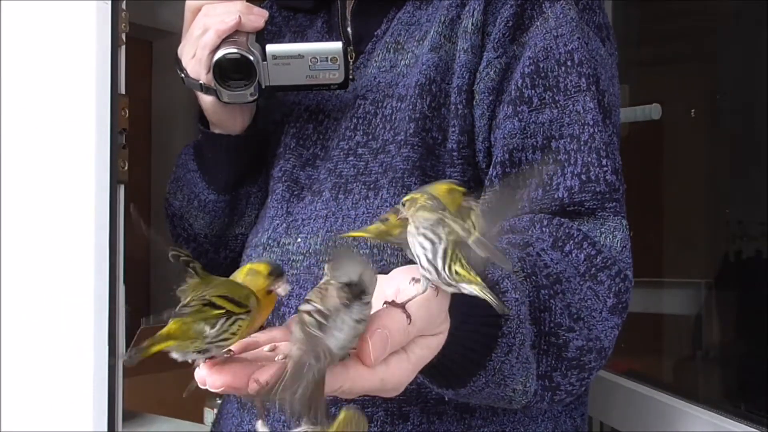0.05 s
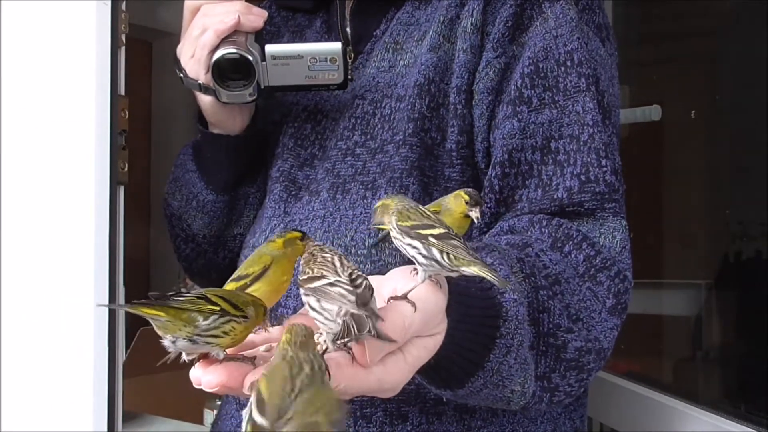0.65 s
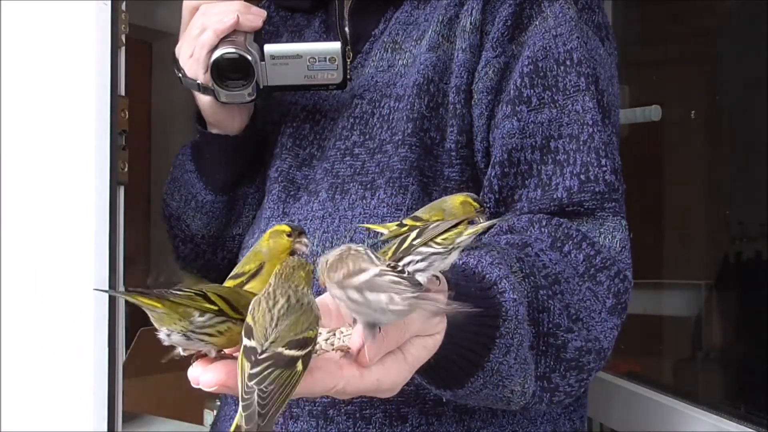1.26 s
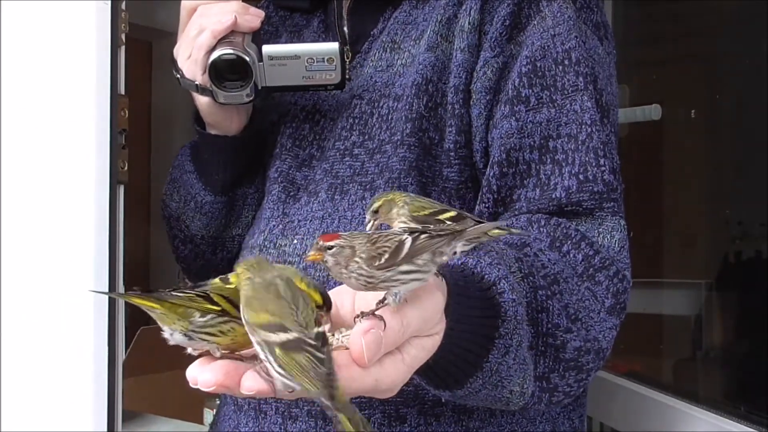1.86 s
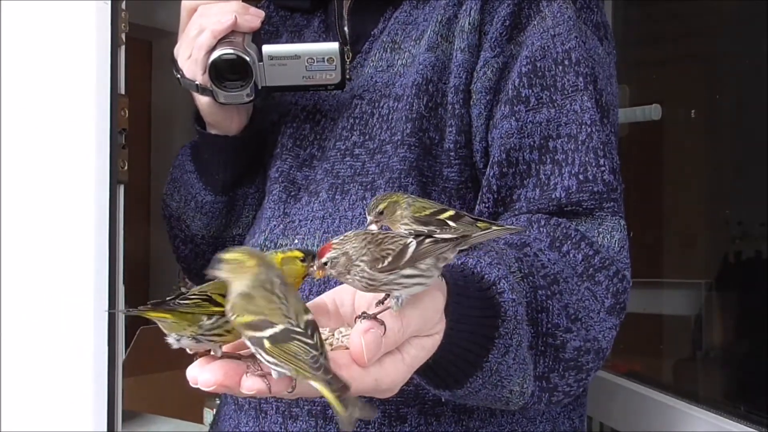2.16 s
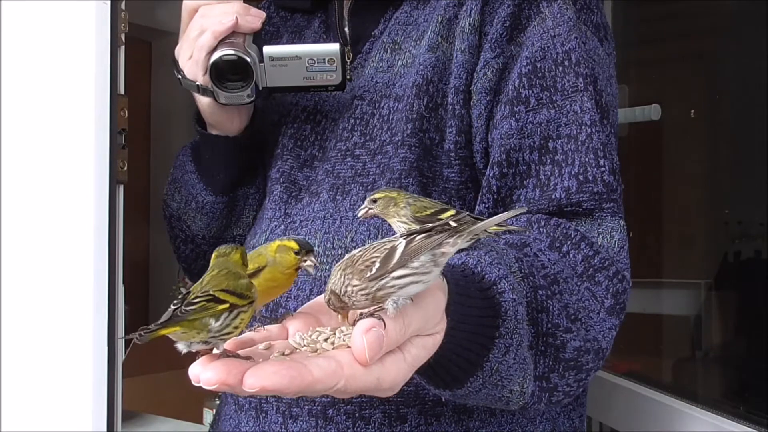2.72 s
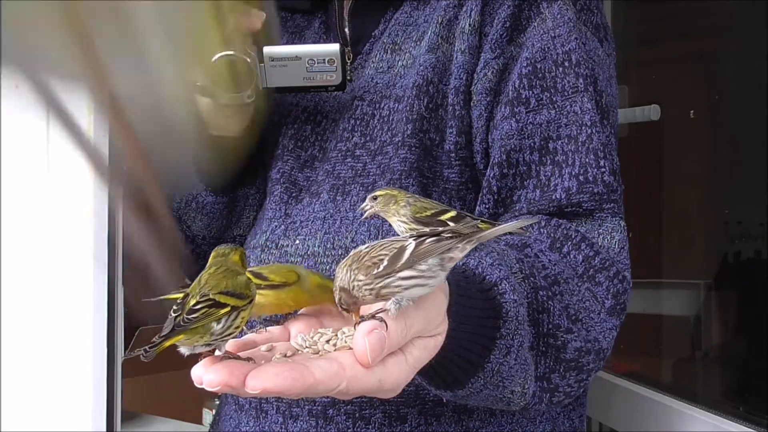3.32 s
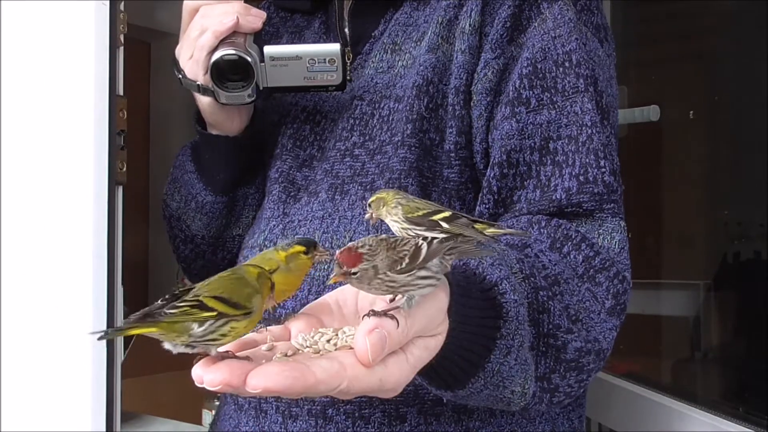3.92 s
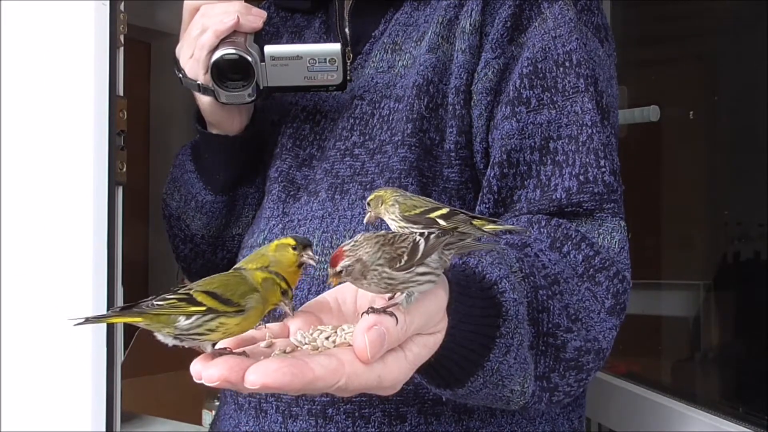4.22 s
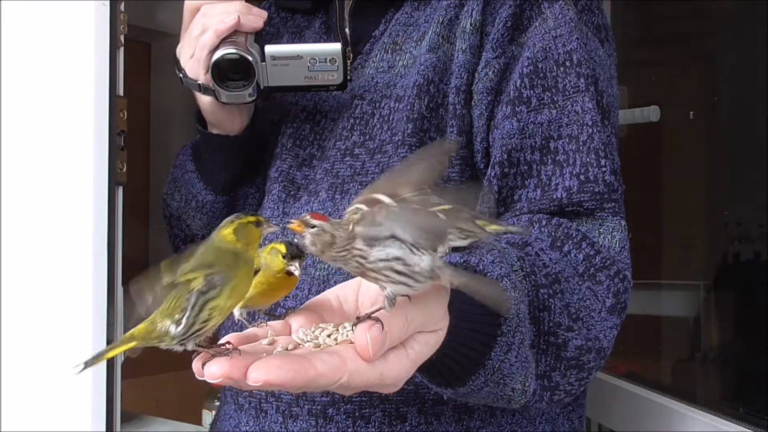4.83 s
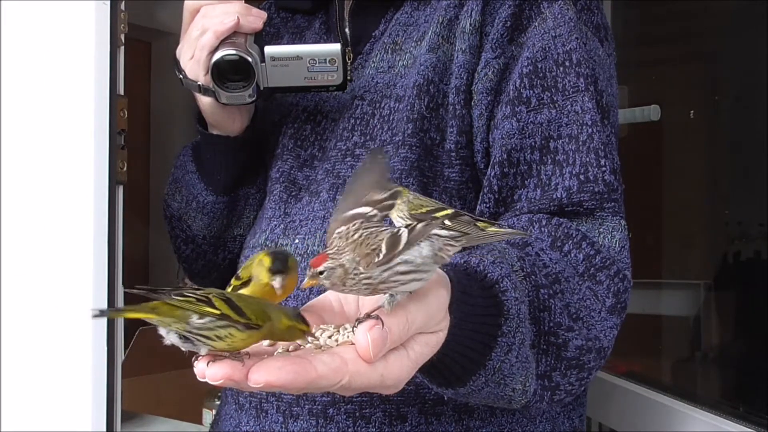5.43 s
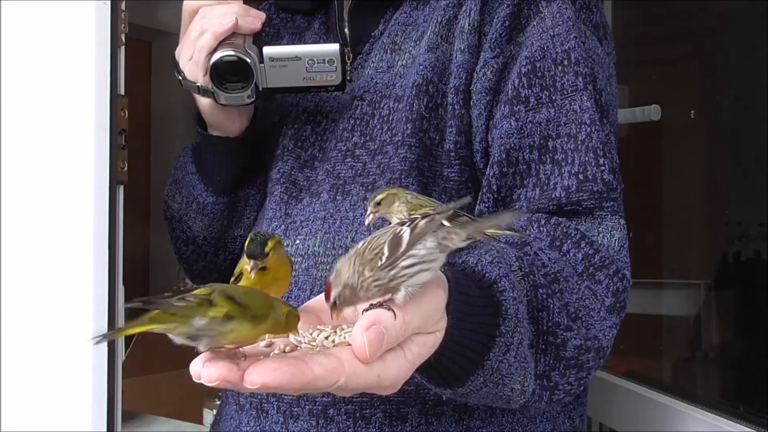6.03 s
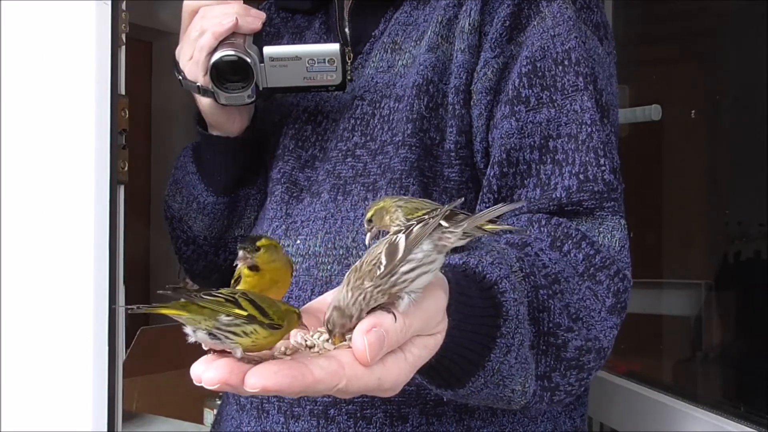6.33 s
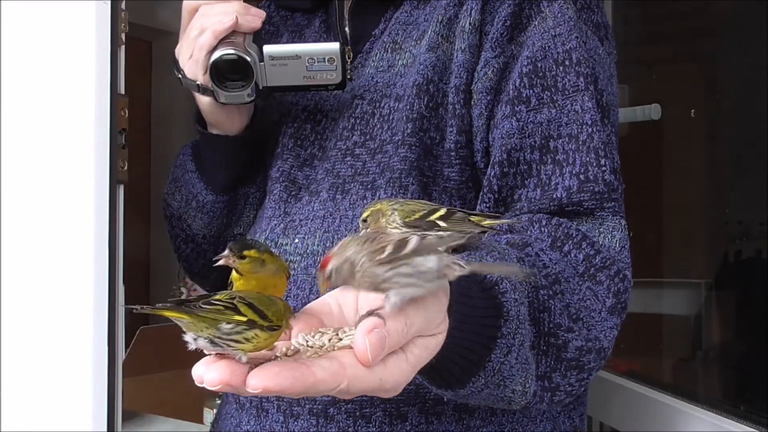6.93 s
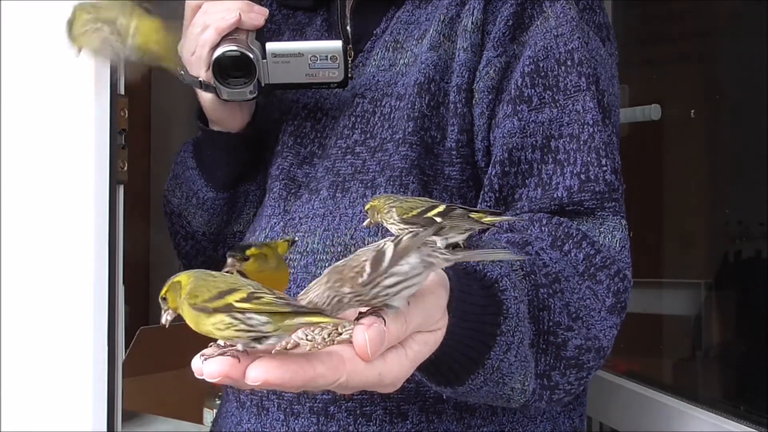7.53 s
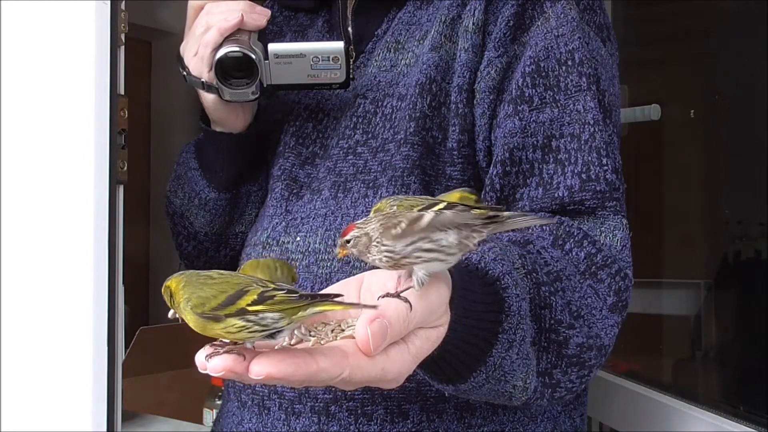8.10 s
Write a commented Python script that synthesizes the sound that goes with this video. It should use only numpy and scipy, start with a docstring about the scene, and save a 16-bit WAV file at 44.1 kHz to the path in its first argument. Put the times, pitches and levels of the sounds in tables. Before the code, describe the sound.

Rapid, raspy, high chirps come in bouts from finches quarrelling right by the microphone, mixed with fluttering wings and crisp feather snaps. After a short lull with light flutters and a scrape, the scolding starts again and continues in bursts. Passing wings push a few low puffs of air into the microphone, loudest late on. Behind it all are tiny seed ticks, far twittering and a soft outdoor hush.

```python
"""Finches squabbling over seed

Small finches feed on a hand beside a house wall. One scolds in quick falling notes, harsh because
the two sides of its syrinx beat against each other. Wings whirr, feathers flick and scrape, and now
and then a wing fans the microphone. Husks tick; the far flock twitters over a soft outdoor rush."""
import sys
import numpy as np
from scipy import signal
from scipy.fft import rfft, irfft
from scipy.io import wavfile

SR = 44100
rng = np.random.default_rng(int(sys.argv[2]) if len(sys.argv) > 2 else 0)


def log_audio(samples):
    """Write samples as a 16-bit WAV file to the path given in sys.argv[1]."""
    # one column per channel
    frames = np.atleast_2d(samples).T
    # limit to full scale, then quantise
    limited = np.clip(frames, -1, 1)
    pcm = np.round(limited * 32767).astype(np.int16)
    wavfile.write(sys.argv[1], SR, pcm)


N = 359856
TIME = np.arange(N) / SR

# Scolding notes, in bouts of about nine a second: peak_s, effort_db, gape_treble_db, peak_hz
SCOLD_NOTES = [(0.03, 3.5, -3, 3995), (0.138, 4, -11, 3500), (0.272, 0, 13.5, 3730), (0.384, 0.5, -2, 3425),
               (0.486, -1, 3, 3490), (0.605, 1.5, 5, 3464), (0.777, -8.5, 3, 3090),
               (0.892, -3.5, -12, 3555), (1.322, -8.5, 7.5, 3720), (1.432, -9, 7, 3520),
               (1.539, -0.5, 10.5, 3475), (1.646, -0.5, 8.5, 3760), (1.756, -3.5, 10, 3700),
               (1.883, -8, 9, 3480), (3.671, -10.5, -1, 4090), (3.763, 4, 1.5, 3730), (3.872, 2, 2, 3866),
               (3.988, -9, 3, 3420), (4.483, -11, 2.5, 3950), (4.583, -4, 11, 4015),
               (4.689, 1.5, 8.5, 4055), (4.794, 0.5, 5, 4120), (4.902, 0.5, 2.5, 3970),
               (5.015, 2, 1.5, 3980), (5.128, 1, -3.5, 3600), (5.237, -1, 10.5, 3834),
               (5.343, -3.5, 5, 3440), (6.272, -11, -5, 3930), (6.375, -0.5, 2, 3615),
               (6.514, -2.5, 1.5, 3284), (6.69, -1, 0.5, 3485), (6.783, 7, -5, 3884), (6.894, 7, -2, 3960),
               (7.035, 3.5, -2.5, 3525), (7.16, -2.5, 5.5, 3410), (7.341, -9, 10, 3430),
               (7.449, -7, 8.5, 3356), (7.796, -10, 1, 3270), (7.914, -6, 3, 3305), (8.026, 1.5, 1, 3760),
               (8.139, -4, 6, 3520)]
# Fall of an ordinary note: time_from_peak_in_fall_lengths, pitch_hz
NOTE_SLIDE = [(.16, 2714), (.42, 2373), (0.722, 2043), (1.1, 1745)]
# Strength of the fundamental, changing slowly and fullest near 5 s: time_s, relative_db
FUNDAMENTAL_LEVEL = [(0, -41.5), (1.6, -36.5), (5.2, -35), (8, -38.5)]
# Wingbeats as birds land, spar and leave: start_s, length_s, whirr_relative_db, swish_relative_db
WING_FLURRIES = [(0, 0.21, -43, -42.5), (0.306, 0.6, -48, -45), (0.882, 0.12, -43.5, -36.5),
                 (1.201, 0.031, -39.5, -44.5), (1.413, 0.36, -81, -46.5), (1.87, 0.098, -55, -39.5),
                 (2.397, 0.11, -43, -42.5), (2.728, 0.068, -44.5, -51), (3.451, 0.22, -39.5, -45),
                 (3.742, 0.088, -38.5, -46.5), (3.926, 0.13, -37.5, -42), (4.123, 0.26, -41, -47.5),
                 (4.385, 0.23, -35, -50.5), (4.638, 0.46, -40.5, -44), (5.03, 0.35, -48, -45),
                 (5.568, 0.45, -51, -55.5), (6.406, 0.32, -43, -52), (6.737, 0.79, -43.5, -54.5),
                 (7.568, 0.52, -46, -47)]
# Wings passing the microphone (pan 0 is left; a negative pan puts the channels in antiphase):
# closest_s, beats_before, period_s, level_db, loss_per_beat_db, eddy_hz, pan_rad
WING_PASSES = [(0.802, 0, 0.029, -25.5, 5.6, 153, 0.5), (3.5, 1, 0.042, -22.5, 4.7, 115, 1),
               (6.547, 1, .046, -24.5, 6, 83, 0.09), (7.19, 0, .036, -9, 8, 114, -1.075)]
# Feathers snapping past each other: peak_s, level_db, half_width_s, low_over_high_db
FEATHER_FLICKS = [(0.97, -38, 0.0032, -1), (0.988, -28.5, 0.0066, -14), (1.009, -19.5, 0.0041, -15),
                  (1.015, -18.5, 0.0025, -16), (1.031, -40, 0.0011, -1), (1.072, -25, 0.002, -14),
                  (1.085, -21, 0.0023, -11.5), (1.1715, -28, 0.002, -14), (1.185, -26.5, 0.0015, -10),
                  (1.845, -33, 0.004, -17), (1.857, -35, 0.003, -22), (1.896, -28.5, 0.0024, -4.5),
                  (1.988, -32.5, 0.0021, -25), (2.041, -32, 0.0021, -34), (2.047, -31, .0018, -24),
                  (2.381, -16, 0.0012, -11.5), (3.277, -46, 0.0014, -14), (3.307, -25.5, 0.0023, -20)]
# Feathers and claws dragging: start_s, length_s, level_db, low_over_high_db
DRAGS = [(1.1077, 0.0033, -26, -10), (3.243, 0.062, -43, -19), (3.307, 0.016, -35.5, -16),
         (3.334, 0.015, -35, -11), (3.542, 0.024, -30.5, 7)]
# Distant calls: start_s, length_s, start_hz, end_hz, relative_db
FAR_CALLS = [(1.375, .095, 3640, 3910, -53), (1.98, 0.04, 5050, 4700, -54.5),
             (2.13, 0.15, 5960, 5320, -63.5), (2.27, 0.06, 4760, 4080, -55),
             (4.045, 0.055, 4300, 3910, -53.5), (4.36, 0.13, 4840, 4600, -57),
             (5.49, 0.056, 4690, 5820, -54), (5.868, 0.012, 3950, 3070, -54),
             (7.51, 0.074, 4260, 3850, -56), (7.725, 0.014, 5050, 3570, -43.5)]

# Noise spectra: frequency_hz, relative_density_db
WHIRR_SPECTRUM = [(20, -22), (65, 3), (120, 1.5), (250, -4.5), (450, -9), (1000, -16.5), (2000, -27.5),
                  (5000, -34)]  # air pushed by wings
SWISH_SPECTRUM = [(200, -18), (900, 11), (1700, -1), (4000, 4), (10000, 3), (13000, 0), (16000, -24)]  # brushing feathers, also husks
FEATHER_LOW_SPECTRUM = [(400, 3.5), (1500, -4.5), (4500, 15), (7000, -12), (16000, -37)]  # body of a flick or scrape
FEATHER_HIGH_SPECTRUM = [(2500, -14), (6000, -1.5), (10000, 8.5), (13500, 3), (16000, -2.5)]  # hiss of a flick
SCRAPE_SPECTRUM = [(1000, -3.5), (5400, -5), (6100, 8), (6900, -0.5), (12000, 4), (16000, -4.5)]  # ring of a scrape
YARD_SPECTRUM = [(1500, 3.5), (4800, -2), (7000, -5), (13000, -3.5)]  # scattered echoes
RUSH_SPECTRUM = [(25, -33), (75, 3.5), (105, -5), (300, -1), (410, -8), (560, -3.5), (1200, -11.5),
                 (1850, -25), (4400, -21), (6500, -28.5), (16000, -28.5)]  # outdoor background
# Likeness of left and right in the diffuse field: frequency_hz, correlation
DIFFUSE_CORRELATION = [(60, 0.68), (300, 0.73), (1300, 0.35), (4000, 0.44), (10000, 0.026)]
# Reverberation time of the yard: frequency_hz, t60_s
YARD_T60 = [(2000, 0.34), (5000, 0.4), (12000, 0.21)]

LEAD_HZ, PEAK_HZ = 3270, 3755  # start of every note; peak of an ordinary note


def syrinx_note(lead_db, first_db, octave_db, upper_db, fall_s, peak_hz):
    """Coupled oscillators: after a rising hook, the syrinx's two sides fall, beat and form sidebands."""
    size, jitter, rasp, breath_db, coupling = 4096, .008, .18, -14, .66
    u = (np.arange(size) - size // 2) / SR / (fall_s * rng.uniform(.94, 1.1))  # time in fall lengths
    hook = [(rng.uniform(-.28, -.12), LEAD_HZ), (.02, peak_hz)]
    course = hook + [(at, hz * np.sqrt(peak_hz / PEAK_HZ)) for at, hz in NOTE_SLIDE]
    waver = 1 + .04 * wander(size, 330) * (u < .1) + jitter * wander(size, 480)
    hz = np.interp(u, *np.transpose(course)) * waver
    start = -rng.uniform(.26, .44)
    lead = amp(lead_db) * np.interp(u, [start - .06, start, -.2, 0, .24], [0, .2, .33, 1, 0])
    slide = np.interp(u, [.02, .18, .68, 1.18], [0, 1, .95, 0])
    gap_hz = 260 + 416 * np.clip(u, 0, 1)  # the two sides draw apart as they fall
    gap_hz = gap_hz * rng.uniform(.85, 1.15) * (1 + .13 * wander(size, 300))
    carrier, beat = (np.exp(2j * np.pi * np.cumsum(f) / SR) for f in (hz, gap_hz))
    # Throat resonance near 5 kHz, and a bright shelf when the beak gapes: frequency_hz, gain_db
    throat = [(1600, first_db - 18), (2300, first_db + 1.5), (3600, octave_db - .5),
              (5500, octave_db + 3.5), (7400, upper_db - 5), (11500, upper_db - 9.5),
              (14500, upper_db - 35)]
    sound, lead_tilt_db = np.zeros(size), rng.uniform(-13, -7)
    for k in range(1, 7):
        breath = amp(breath_db) * np.sqrt(k) * (wander(size, 900) + 1j * wander(size, 900))
        side = coupling * beat * np.exp(2j * np.pi * rng.random())
        sidebands = (1 + side) ** k + side ** (k + 1) * coupling
        sidebands /= np.sqrt(np.mean(abs(sidebands) ** 2))
        voice = (1 + rasp * wander(size, 520)) * sidebands + breath
        lead_partial = unit((carrier ** k * (1 + side / 2 + breath * k)).imag)
        sound += lead * amp(lead_tilt_db * (k - 1) ** .97) * lead_partial
        throat_gain = amp(at_hz(throat, k * (hz + gap_hz / np.pi)) - 3.5)
        sound += slide * throat_gain * unit((carrier ** k * voice).imag)
    return sound


def chatter():
    """Source and filter: vocal effort sets the balance of partials, and a gaping beak adds treble."""
    out = np.zeros((2, N))
    for peak_s, effort_db, gape_db, peak_hz in SCOLD_NOTES:
        lead_db = -31 + .56 * effort_db + 27 * np.log2(peak_hz / PEAK_HZ)  # a high hook is loud
        # Soft notes lack the fundamental; hard ones favour the octave.
        first_db = np.interp(peak_s, *np.transpose(FUNDAMENTAL_LEVEL)) - (effort_db / 3.5) ** 2
        note = syrinx_note(lead_db, first_db, octave_db=effort_db - 31.5,
                           upper_db=effort_db + gape_db - 36,
                           fall_s=.035 * (1 + .00884 * effort_db), peak_hz=peak_hz)
        note = early_echoes(note, echo_db=-6, first_s=.0006, last_s=.013)
        add(out, peak_s - 2048 / SR, note)  # the hook peaks about 2048 samples in
    return out


def flurry(start_s, length_s, release_s, attack_s=.015):
    """Exponential decay: wings open quickly, keep beating, then wind down."""
    attack = np.clip((TIME - start_s) / attack_s, 0, 1)
    return attack * np.exp(-np.clip((TIME - start_s - length_s) / release_s, 0, 20))


def wings(beat_hz=23, crackle_db=2.5):
    """Amplitude modulation: each wingbeat pushes air and swishes the feathers in a sharp stroke."""
    air = np.max([amp(db) * flurry(s, length, .051) for s, length, db, _ in WING_FLURRIES], axis=0)
    feathers = np.max([amp(db) * flurry(s, length, .03) for s, length, _, db in WING_FLURRIES], axis=0)
    beats = np.cumsum(beat_hz * (1 + .12 * wander(N, 18))) / SR
    # Each flurry opens on a downstroke.
    beats -= np.max([beats[round(s * SR)] * (TIME >= s) for s, *_ in WING_FLURRIES], axis=0)
    push = unit(np.exp(.3 * np.sin(2 * np.pi * beats) + .19 * wander(N, 39)))
    stroke = np.interp(beats % 1, [0, .06, .25, .5, 1], [0, 1, .8, 0, 0])
    vigour_db = 2.5 * wander(N, 22)
    brush = unit((.5 + stroke) * amp(crackle_db * wander(N, 660) + vigour_db))
    whirr = noise(WHIRR_SPECTRUM, .78) * push * air * amp(-5)
    swish = noise(SWISH_SPECTRUM, .081) * brush * feathers * amp(-3.5)
    return whirr * amp([[-1], [1]]) + swish  # the whirr leans right


def draughts(eddy_half_width_s=.0083, beats_after=3):
    """Vortex shedding: a passing wing throws an eddy at the microphone each beat, weaker from afar."""
    out, size = np.zeros((2, N)), 8192
    t, f = (np.arange(size) - size // 2) / SR, np.fft.rfftfreq(size, 1 / SR)
    swell = 1 / (1 + (t / eddy_half_width_s) ** 2)
    skirt = amp(-12) * f / (f + 30) / (1 + (f / 330) ** 4)
    for closest_s, beats_before, period_s, db, loss_db, eddy_hz, pan_rad in WING_PASSES:
        band = np.exp(-(np.log((f + 1) / eddy_hz) / .83) ** 2) + skirt
        pan = [np.cos(pan_rad), np.sin(pan_rad)]
        for k in range(-beats_before, beats_after + 1):
            gust = rng.standard_normal(size) * swell
            eddy = unit(irfft(rfft(gust) * band)) * np.sqrt(np.mean(swell ** 2))
            add(out, closest_s + k * period_s - t[-1], amp(db - loss_db * abs(k)) * np.outer(pan, eddy))
    return out


def flicks(tail_db=-20, tail_s=.009):
    """Sliding friction: feather vanes sweep past each other in a few milliseconds of crackle."""
    out, size = np.zeros((2, N)), 4096
    t = (np.arange(size) - size // 2) / SR
    tail = amp(tail_db) * (t > 0) * np.exp(-abs(t) / tail_s)
    for peak_s, db, half_width_s, low_db in FEATHER_FLICKS:
        hiss = noise(FEATHER_HIGH_SPECTRUM, .059, size)
        body = amp(low_db) * noise(FEATHER_LOW_SPECTRUM, 1, size)
        stroke = np.exp(-(abs(t) / half_width_s) ** 1.67) + tail
        crackle = amp(1.5 * wander(size, 970))
        add(out, peak_s - t[-1], amp(db) * unit(hiss + body) * stroke * crackle)
    return out * amp([[-1], [1]])


def scrapes(attack_s=.001, release_s=.0066):
    """Stick-slip friction: stiff feathers and claws catch, drag with a gritty rasp and let go."""
    out, size = np.zeros((2, N)), 8192
    t = TIME[:size]
    for start_s, length_s, db, low_db in DRAGS:
        ring = noise(SCRAPE_SPECTRUM, .15, size)
        body = amp(low_db) * noise(FEATHER_LOW_SPECTRUM, 1, size)
        grit = unit(amp(3.5 * wander(size, 1800) + 2 * wander(size, 130)))
        drag = np.minimum(t / attack_s, 1) * np.exp(-np.maximum(t - length_s, 0) / release_s)
        add(out, start_s, amp(db) * unit(ring + body) * grit * drag)
    return out


def seeds(ticks_per_s=9, decay_s=.00078):
    """Impact excitation: beaks and claws strike husks at random, each giving a damped tick."""
    strikes = rng.random(N) < ticks_per_s / SR
    force = amp(-56 + 5 * np.minimum(rng.exponential(1, N), 2))
    husk = noise(SWISH_SPECTRUM, .16, 512) * np.exp(-TIME[:512] / decay_s)
    return signal.oaconvolve((strikes * force)[None], husk, axes=1)[:, :N]


def flock(waver=.031, faint_calls=170):
    """Frequency modulation: far birds whistle thin, wavering glides over the twitter of many more."""
    out, size = np.zeros((2, N)), 8000
    crowd = rng.uniform([0, .02, 3100, 3100, -68], [N / SR, .07, 5700, 5700, -68], (faint_calls, 5))
    for start_s, length_s, start_hz, end_hz, db in [*FAR_CALLS, *crowd]:
        progress = np.clip(TIME[:size] / length_s, 0, 1)
        glide_hz = start_hz + (end_hz - start_hz) * np.sin(np.pi / 2 * progress)
        hz = glide_hz * (1 + waver * wander(size, 320))
        envelope = amp(db + 10) * np.sqrt(abs(np.sin(np.pi * progress)))
        whistle = envelope * np.sin(2 * np.pi * np.cumsum(hz) / SR)
        add(out, start_s, early_echoes(whistle, echo_db=-2.5, first_s=.001, last_s=.03))
    return out


def early_echoes(x, echo_db, first_s, last_s, count=10):
    """Reflection: hand and wall return delayed copies, reaching left and right a sample or so apart."""
    taps = np.zeros((2, 1024))
    delays = (SR * rng.uniform(first_s, last_s, count)).astype(int)
    heights = amp(echo_db) * rng.choice([-1, 1], count) / np.sqrt(count)
    for ear in taps:
        ear[(delays + rng.integers(-1, 2, count)) % len(ear)] = heights  # delays wrap at 23 ms
    taps[:, 0] = 1
    return signal.fftconvolve(x[None], taps, axes=1)


def yard(x, predelay_s=.008):
    """Reverberation: walls and trees scatter the sound, and the high treble dies first."""
    size = 20000
    scatter = noise(YARD_SPECTRUM, DIFFUSE_CORRELATION, size) * (TIME[:size] > predelay_s)
    hz, t, bands = signal.stft(scatter, SR, nperseg=256)
    decay = amp(-60 * t / at_hz(YARD_T60, hz)[:, None])
    tail = signal.istft(bands * decay, SR, nperseg=256)[1]
    return signal.fftconvolve(x, tail / np.linalg.norm(tail[0]), axes=1)[:, :N]


def outdoors():
    """Diffuse ambient noise: a soft, steady rush that swells a little."""
    swell = amp(1.4 * wander(N, 1.5))
    return amp(-51) * noise(RUSH_SPECTRUM, DIFFUSE_CORRELATION) * swell


def noise(spectrum, correlation, size=N):
    """Spectral shaping: stereo noise whose left-right correlation is a number or a table."""
    hz = np.fft.rfftfreq(size, 1 / SR)
    left, independent = rfft(rng.standard_normal((2, size)))
    shared = correlation if np.isscalar(correlation) else at_hz(correlation, hz)
    right = shared * left + np.sqrt(1 - shared ** 2) * independent
    return unit(irfft(np.array([left, right]) * amp(at_hz(spectrum, hz)), size))


def wander(size, hz):
    """Low-pass noise: a smooth fluctuation of rms 1 and bandwidth about hz."""
    f = np.fft.rfftfreq(size, 1 / SR)
    return unit(irfft(rfft(rng.standard_normal(size)) * np.exp(-(f / hz) ** 2) * (f > 0), size))


def amp(db):
    """Decibels as an amplitude ratio."""
    return 10 ** (np.asarray(db) / 20)


def unit(x):
    """Normalisation to rms 1."""
    return x / np.sqrt(np.mean(x ** 2) + 1e-20)


def at_hz(table, hz):
    """Interpolation on a log-frequency axis."""
    f, value = np.transpose(table)
    return np.interp(np.log(hz + 1), np.log(f + 1), value)


def add(mix, start_s, sound):
    """Superposition: a stereo sound joins the mix at start_s."""
    start = round(start_s * SR)
    part = mix[:, max(start, 0):max(start + sound.shape[1], 0)]
    part += sound[:, max(-start, 0):][:, :part.shape[1]]


def scene():
    """Direct-to-reverberant ratio: near birds are fairly dry, the far flock is rich in echo."""
    voice, feathers, far = chatter(), flicks() + scrapes(), flock() / 2
    echo = yard(amp(-10) * voice + amp(-14) * feathers + far)
    return voice + feathers + far + echo + wings() + draughts() + seeds() + outdoors()


def record(dry):
    """Band limiting: a steep low-pass filter at 16.2 kHz."""
    lowpass = signal.firwin(401, 16200, window=("kaiser", 9), fs=SR)
    return signal.oaconvolve(dry, lowpass[None], "same", axes=1)


dry = scene()
out = record(dry)
log_audio(out)
```